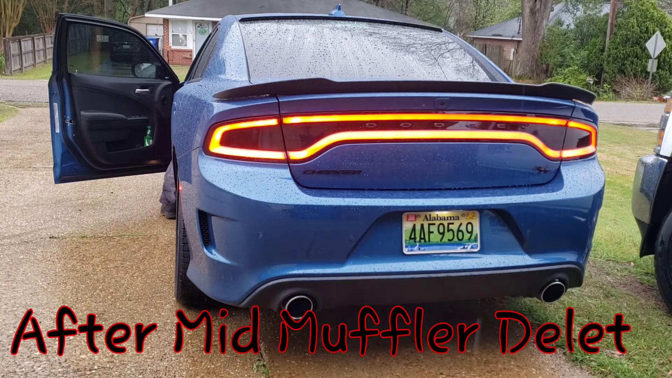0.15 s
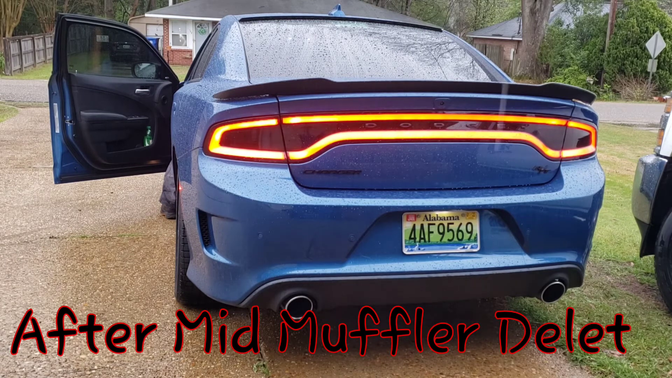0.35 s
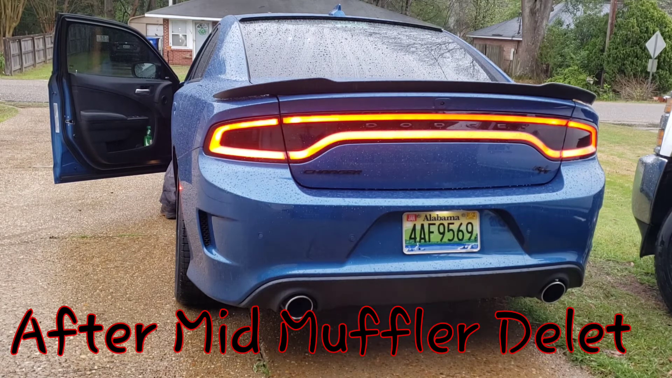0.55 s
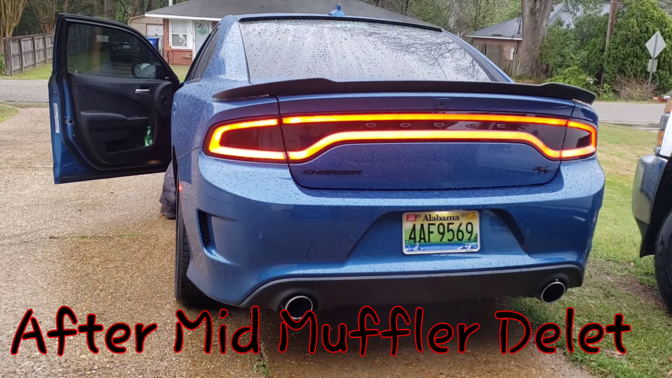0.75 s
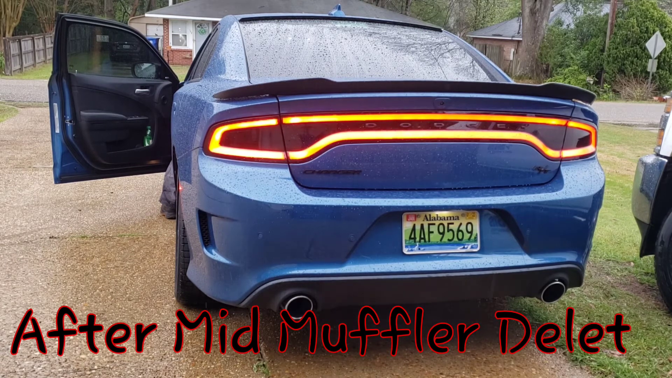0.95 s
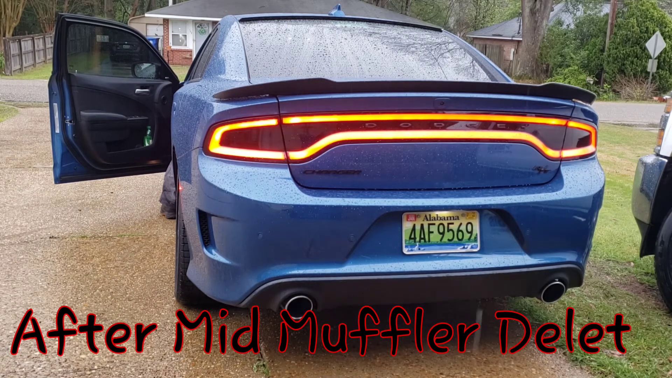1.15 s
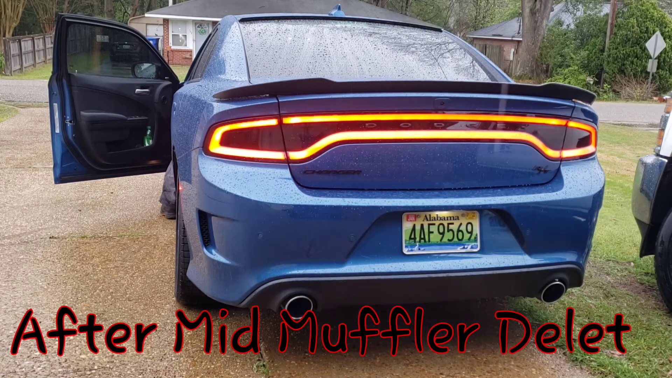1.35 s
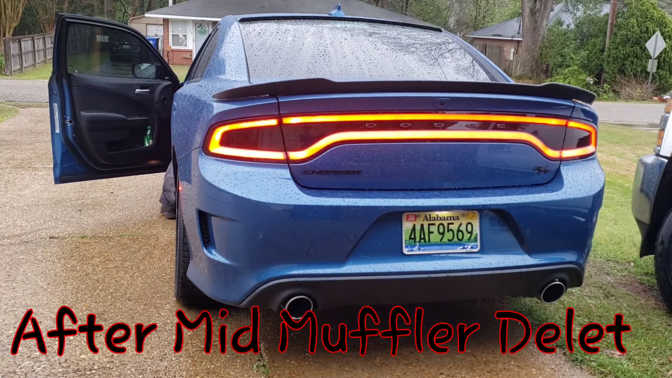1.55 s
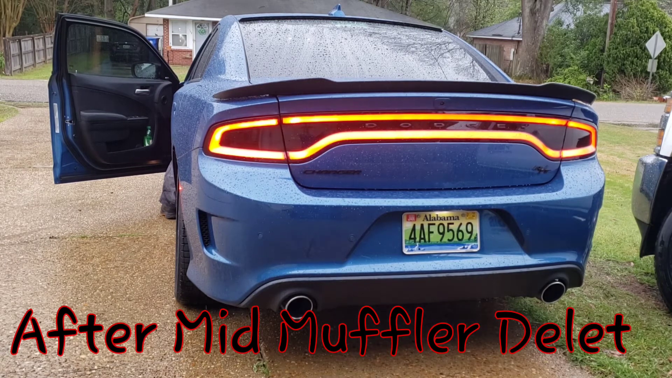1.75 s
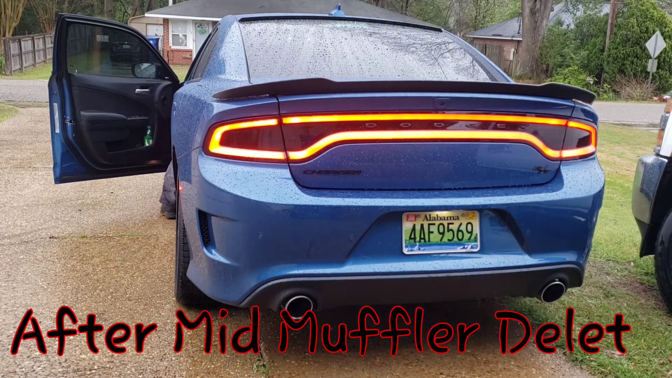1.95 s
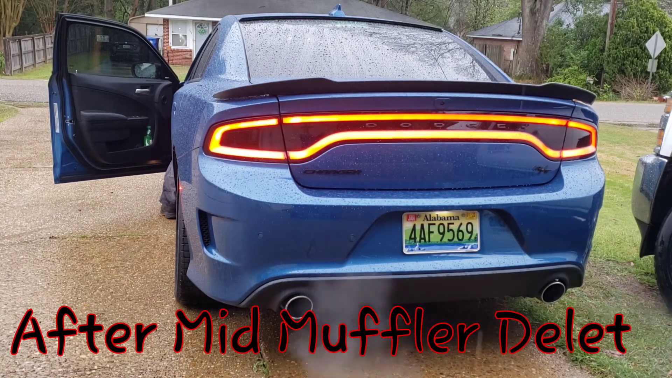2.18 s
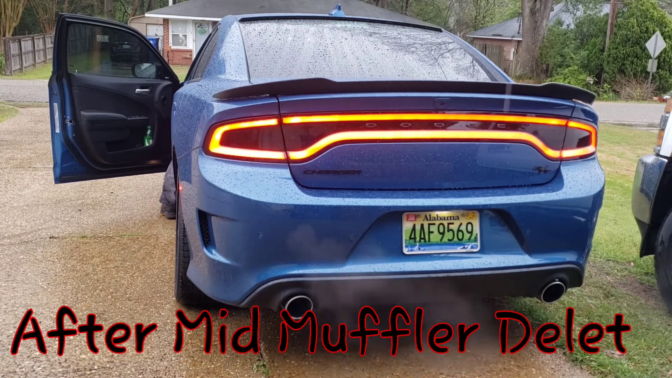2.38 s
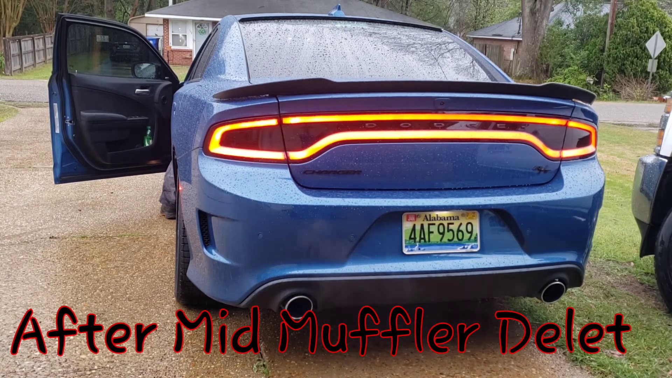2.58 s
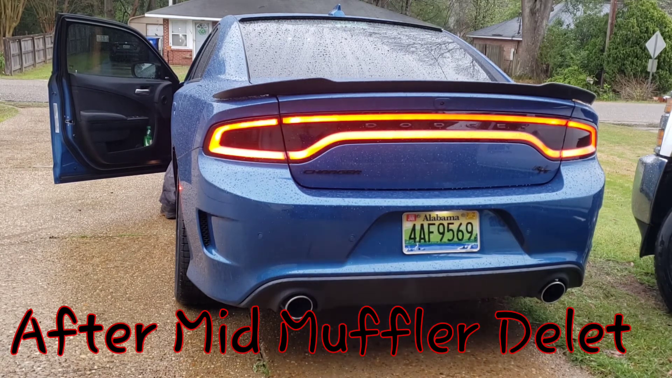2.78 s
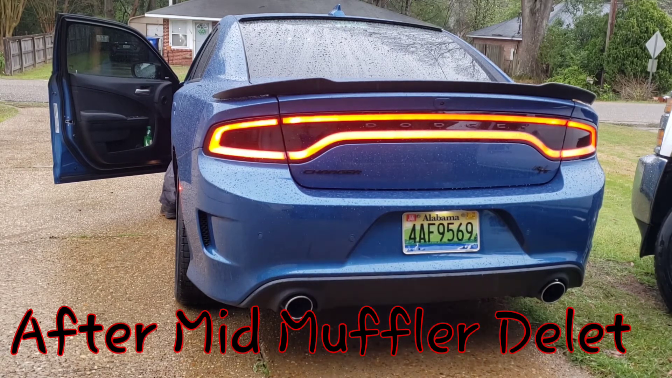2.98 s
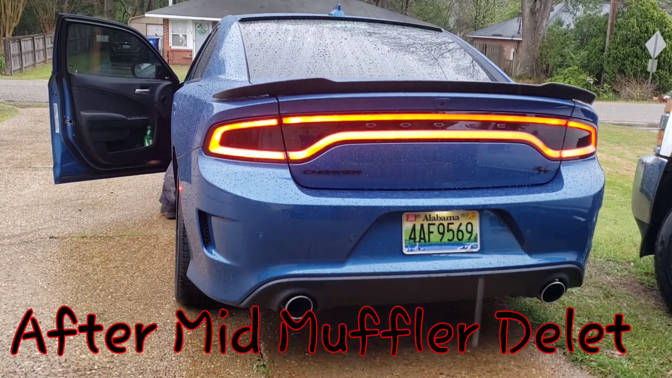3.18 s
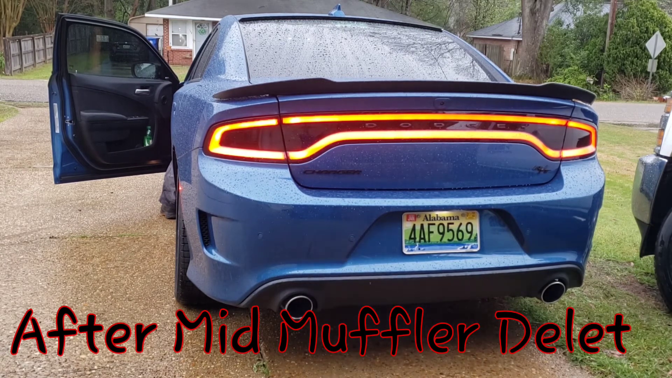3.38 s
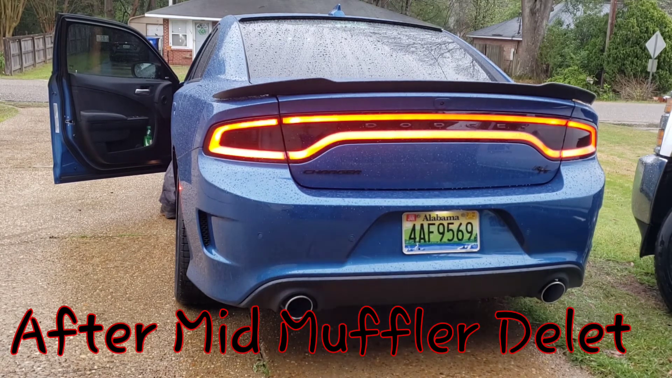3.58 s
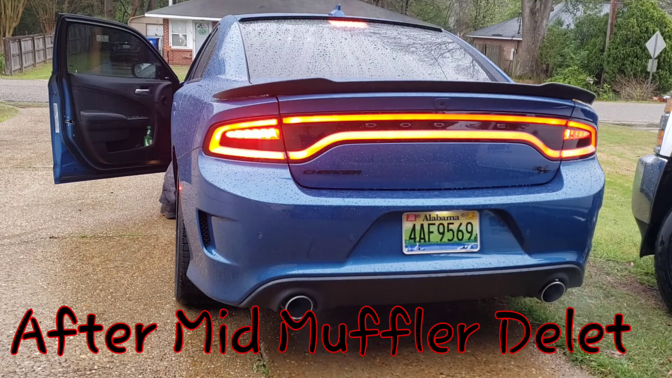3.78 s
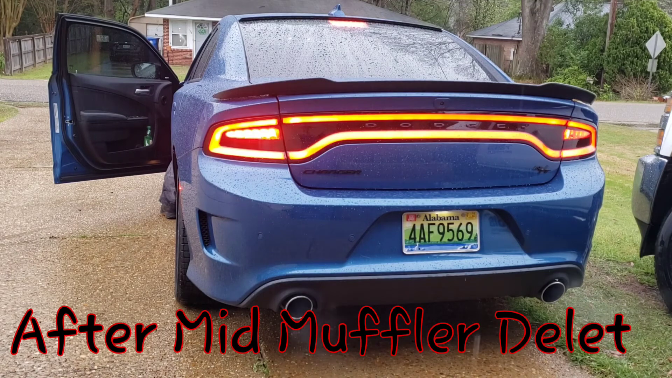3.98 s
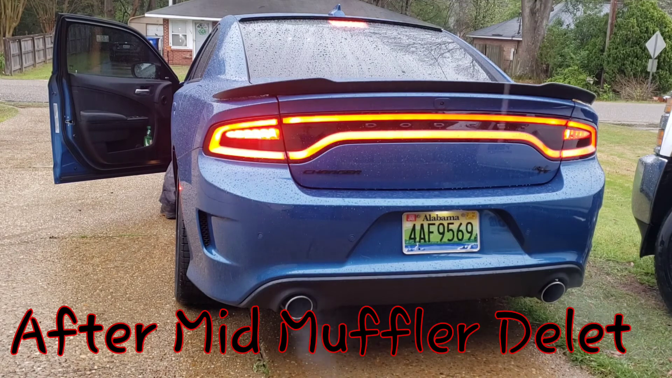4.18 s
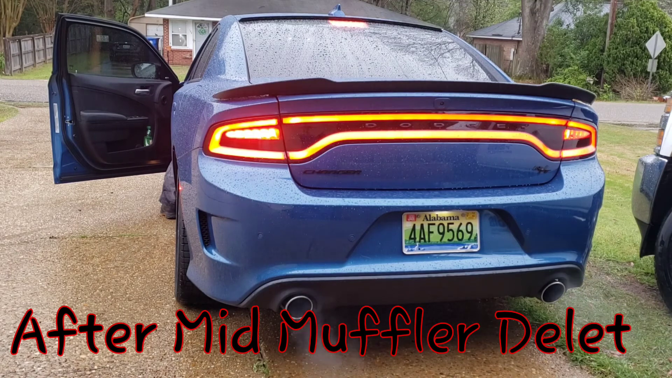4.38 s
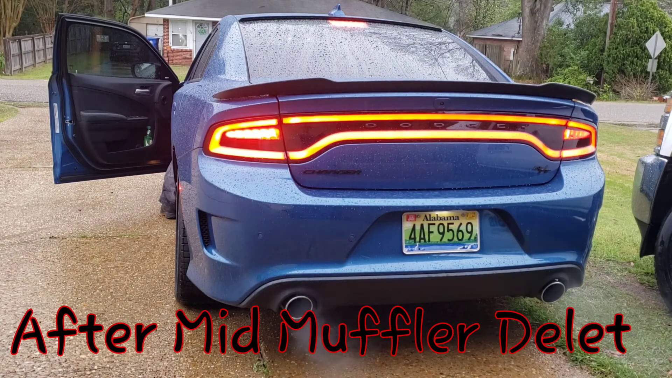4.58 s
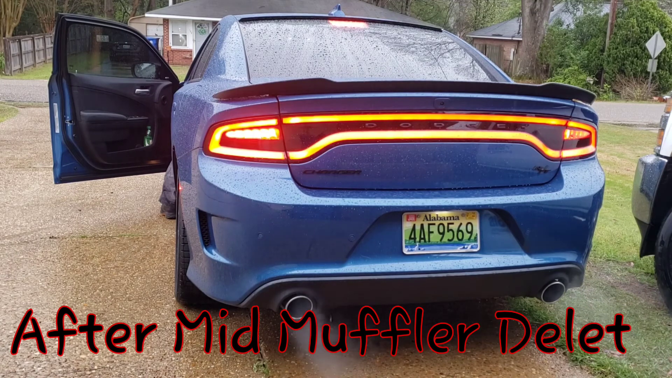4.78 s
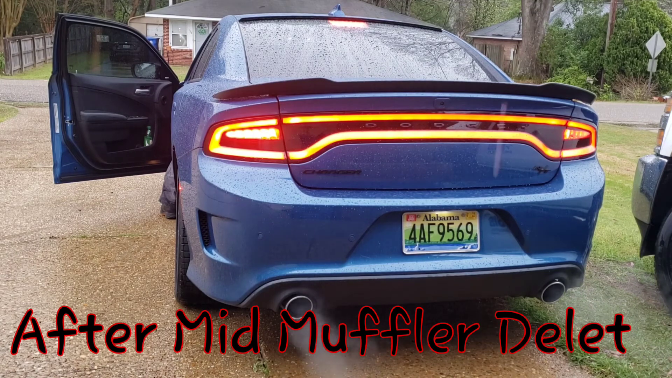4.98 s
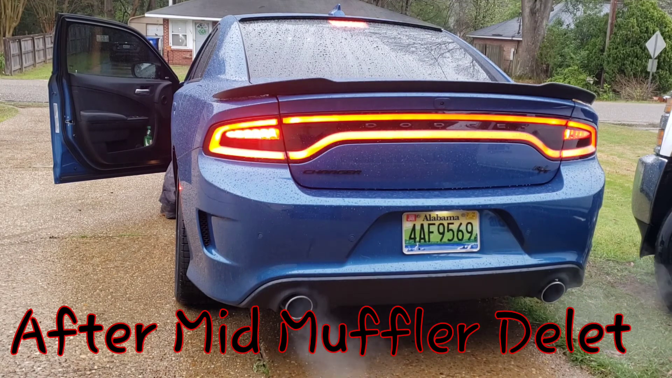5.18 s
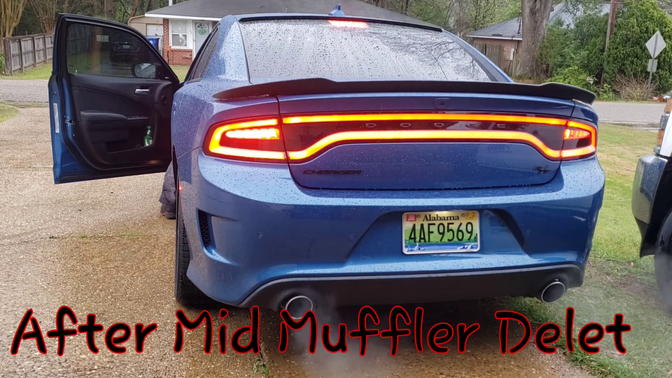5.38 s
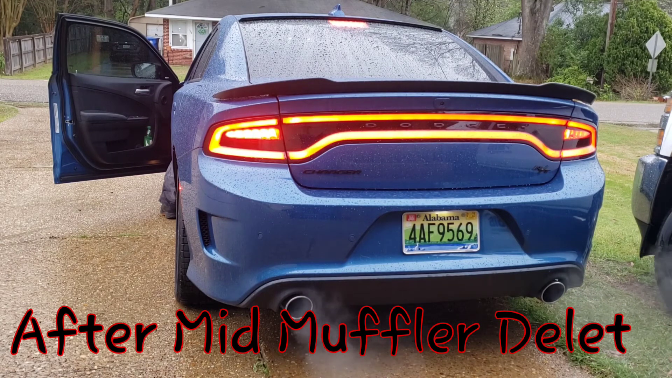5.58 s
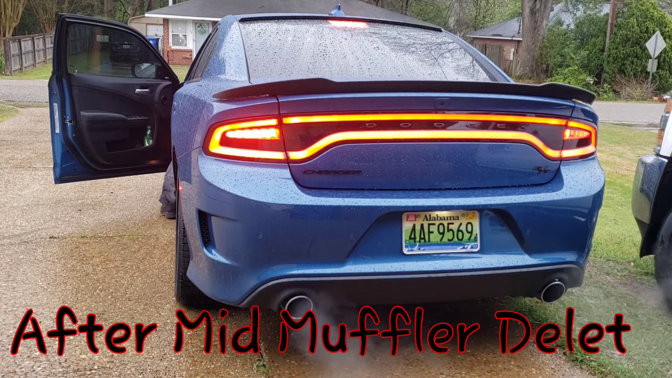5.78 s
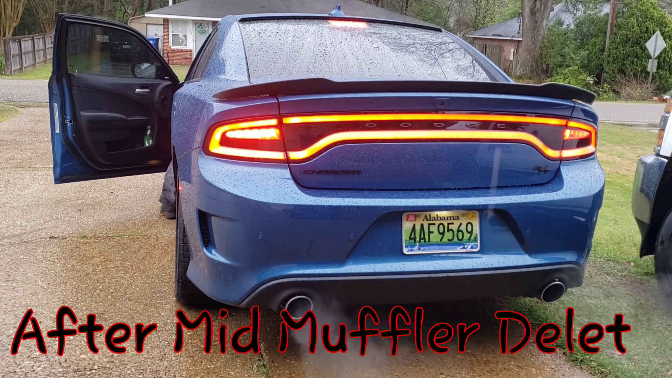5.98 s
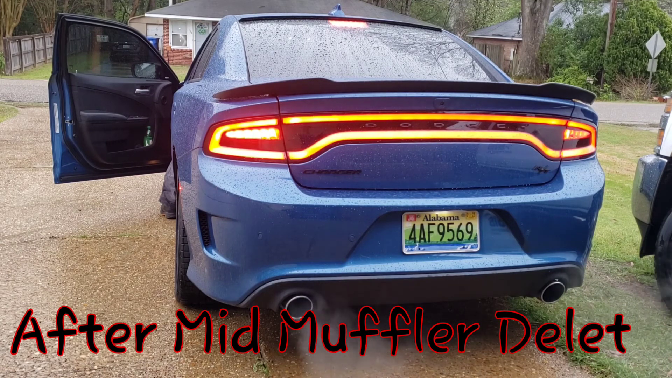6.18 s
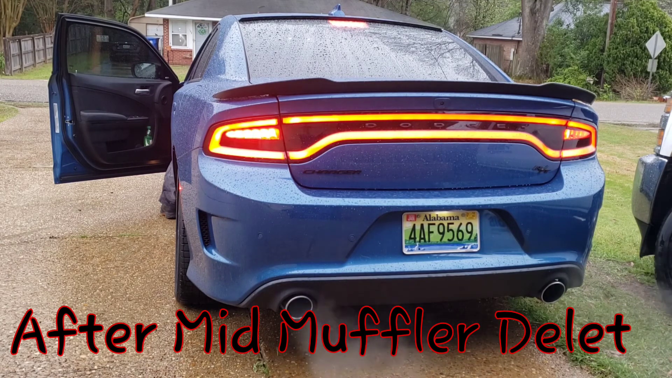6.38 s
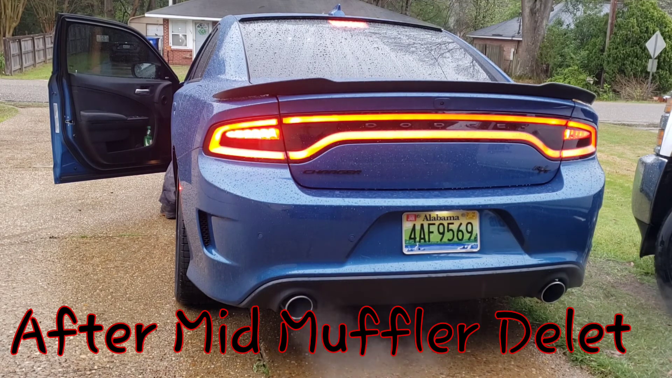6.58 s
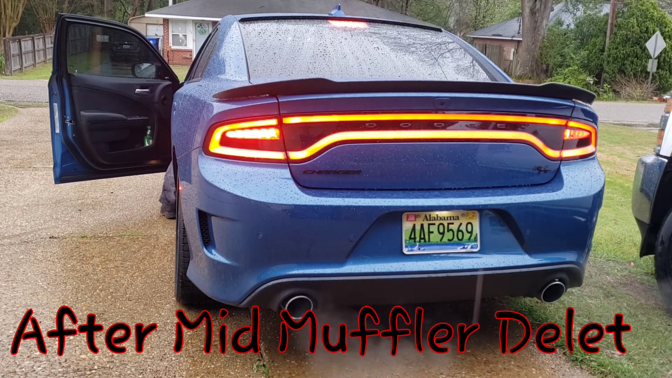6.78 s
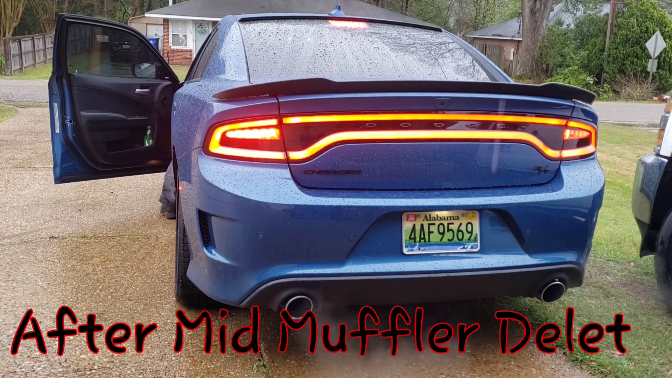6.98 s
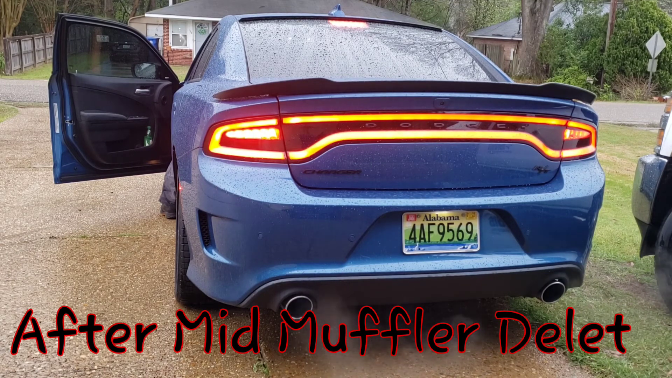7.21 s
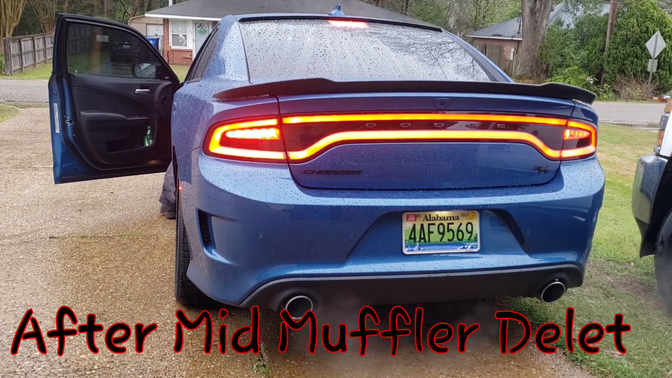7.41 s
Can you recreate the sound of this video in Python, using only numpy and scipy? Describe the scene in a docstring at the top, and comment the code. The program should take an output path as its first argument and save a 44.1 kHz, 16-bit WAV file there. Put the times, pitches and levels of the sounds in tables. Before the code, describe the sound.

A loud V8 car engine revs in sharp, popping blips, winds down almost to silence, then settles into a low idle.

```python
"""Open-exhaust V8 in a driveway

The engine is blipped several times, coasts down almost silent, then settles to idle.
Firings ring the pipes, the two banks beat unevenly, gas hisses and rasps at the tips.
Unburnt fuel pops and loose metal ticks. A phone stands behind the car, in the yard's echo."""
import sys
import numpy as np
from scipy import signal
from scipy.io import wavfile
from scipy.ndimage import uniform_filter1d

SR = 44100
rng = np.random.default_rng(int(sys.argv[2]) if len(sys.argv) > 2 else 0)


def materialize(psi):
    """Save the field psi as 16-bit PCM at rate SR to the path in sys.argv[1].

    A 1-D psi becomes a single channel; in a 2-D psi each row is a channel.
    """
    bounded = np.clip(np.atleast_2d(psi).T, -1, 1)
    quanta = np.round(bounded * 32767).astype(np.int16)
    wavfile.write(sys.argv[1], SR, quanta)


N = 328545
IDLE_HZ, IDLE_LOAD_DB, CYCLE_START_S = 59, -19, 6.354

# Engine speed. Each row: time in seconds, firing rate in Hz.
FIRING_RATE = [(0, 56.6), (.085, 59), (.1, 68), (.15, 74), (.2, 108), (.26, 128), (.33, 142.6), (.5, 140),
               (.55, 152), (.62, 195), (.71, 213), (.85, 222), (1, 206.7), (1.2, 177), (1.34, 161),
               (1.5, 196), (1.58, 198), (1.75, 162.1), (2.06, 132), (2.14, 150), (2.21, 198), (2.3, 221),
               (2.38, 229), (2.46, 268), (2.55, 281.3), (2.72, 255), (3.1, 213.6), (3.8, 134.9),
               (4.2, 105.1), (4.6, 80.92), (5, 69.3), (5.4, 60.56), (5.7, 58.8), (6.4, 58.83),
               (7.45, 59.67)]
# Engine effort. Each row: time in seconds, load in dB.
LOAD = [(0, -20.5), (.078, -22), (.14, -9.5), (.5, -11), (.62, -11.5), (.84, -13.5), (.94, -17.5),
        (1.02, -16.5), (1.3, -18.5), (1.5, -15), (1.63, -20), (2.07, -22), (2.15, -10), (2.35, -11),
        (2.44, -23), (2.58, -18.5), (2.9, -24.5), (3.5, -28), (3.95, -33.5), (4.6, -38), (4.85, -30),
        (5.3, -19.5), (7.45, -19)]
# Firing order. Each row: relative push, lag in ms, gas puff in dB, rattle over the hiss in dB.
CYLINDERS = [(0.9, 0.46, -3.5, -0.5), (0.83, 2.1, -2.5, -5.5), (1.15, 2.48, -4.5, -11),
             (1.05, 1.62, -10, -3.5), (1.2, 2.05, -11, -9), (0.92, 0.94, 0.5, -2.5), (0.35, 0.57, -0.5, -8),
             (0.96, 2.55, -28, -3)]
# Rows of CYLINDERS that feed the first bank.
FIRST_BANK = [1, 3, 4, 6]
# Pipe resonances. Each row: centre and width in Hz, first and second bank in dB, left minus right in dB.
PIPE_MODES = [(57, 56, -40, -4, -3.5), (146, 67, -40, -4.3, 1), (208, 13, 3.3, 0.9, 0),
              (242, 58, 0.2, -16, -1.8), (282, 17, -8.6, -18, -1.5), (349, 68, -17.5, -18, -1.5),
              (440, 60, -22, -24, -4)]
# Gain with speed, one entry per pipe resonance.
PIPE_DB_PER_OCTAVE = [-8, -6, -8, -1, 0.5, 6, 6]
# Pipe boom. Each row: firing rate in Hz, level over the load in dB.
BOOM_RESPONSE = [(59, 9), (69, -1.5), (80, -33), (105, -10), (133, -8.5), (148, 2.5), (165, -4.5),
                 (190, -24.5), (215, -4), (250, 7.5), (280, -30)]
# Singing resonances. Each row: centre and width in Hz, level at idle load in dB, dB per dB of load.
SINGING_MODES = [(144, 28, -14, 1.05), (243, 62, -20, 2), (302, 40, -26, 1.5), (293, 24, -29, 1.6),
                 (314, 18, -23, 1.05), (158, 15, -26, .35), (400, 32, -36, 2.0)]
# The partial driving each singing resonance, as a multiple of the firing rate.
SINGING_ORDERS = [2, 9 / 8, 11 / 8, 12 / 8, 9 / 8, 5 / 8, 2]
# Spectra of gas, loose metal and thuds. Each row: centre in Hz, width in Hz, level in dB.
HOLLOW_MODES = [(152, 20, 0), (235, 26, 0), (290, 20, -3)]
TIP_MODES = [(399, 104, 5), (584.5, 159, 4.5), (787, 54, -7.5), (847.4, 208, 3.5), (1243, 282, 0),
             (1982, 700, -3), (3000, 480, -7.5), (4900, 500, -21)]
ROAR_MODES = [(452, 92, 6.5), (640, 290, 0), (940, 260, -4.5), (1290, 250, -31)]
RASP_MODES = [(71, 120, 25), (460, 180, 8), (3150, 900, 24.5), (4660, 2300, 22), (6250, 4650, 27.5),
              (10870, 6700, 24), (13400, 1000, -8)]
METAL_MODES = [(2090, 220, -1), (2335, 200, 0), (2560, 260, -6), (3000, 260, -16), (3400, 320, -12),
               (5100, 700, -22)]
THUD_MODES = [(69.5, 64, 1.5), (152.5, 22, -8)]
# Throttle blips. Each row: opening, wide open and start of hiss decay in seconds, thump and hiss in dB,
# rasp crest in seconds, rasp in dB, rasp rise and fall in dB/s.
BLIPS = [(0.084, 0.111, 0.19, -3.5, -15.5, 0.15, -22, 61, 145),
         (0.518, 0.524, 0.63, -8, -15.5, 0.568, -11, 1500, 260),
         (0.968, 1.005, 1.24, -22, -37, 1.05, -50, 150, 150),
         (1.4, 1.422, 1.326, -16.5, -17, 1.53, -62, 150, 150),
         (1.607, 1.67, 2.3, -25, -36.5, 2.1, -43, 144, 151.5),
         (2.088, 2.165, 2.23, -12, -12, 2.21, -24.5, 97, 208),
         (2.358, 2.392, 2.35, -34, -11.5, 2.395, -19.5, 296, 299),
         (2.407, 2.409, 2.48, -17, -19.5, 2.468, -9.5, 30, 370),
         (2.703, 2.719, 2.52, -38, -23.5, 2.3, -61, 150, 152)]
# Afterfire. Each row: start in seconds, gas in dB, snap in dB, snap pitch in Hz, thud in dB.
POPS = [(0.086, -15, -22, 3200, -2), (0.098, -10, -17, 1350, -30), (0.148, -4, -10, 1000, -20),
        (0.198, -7, -13, 1050, -25), (0.228, -12, -12, 2900, -23), (0.518, -6, -11, 1200, -6),
        (0.552, -9, -4, 2900, -9), (0.558, -9, -3, 2200, -20), (0.566, -8, -4, 4600, -18),
        (0.573, -9, -8, 3500, -25), (0.598, -8, -10, 2000, -25), (0.630, -9, -13, 1800, -25),
        (1.0, -30, -40, 900, -15), (1.102, -15, -25, 900, -22), (2.357, -12, -18, 3100, -30),
        (2.365, -8, -11, 2200, -30), (2.379, -10, -13, 2100, -30), (2.391, -6, 3, 3600, -15),
        (2.398, -6, -7, 3600, -20), (2.424, -7, -3, 3600, -14), (2.442, -7, -5, 4800, -3),
        (2.476, -12, -11, 2800, -30), (3.14, -27, -40, 900, -34), (3.455, -30, -43, 900, -40)]
# Metal ticks. Each row: start in seconds, blow in dB, crack relative to the blow in dB.
TICKS = [(0.0867, -18, -10), (0.1143, -12, -8), (0.128, -22, -7), (0.1421, -14, 3), (0.179, -12.5, -12),
         (0.2265, -19, -4), (0.2503, -16, -18), (0.2738, -24, -10), (0.4314, -30, -2), (0.5182, -17, -1),
         (0.533, -18, -9), (0.539, -16, -7), (0.5516, -11, -9), (0.558, -18, -16), (1.2176, -34, 3),
         (1.292, -38, 5), (1.63, -32, 0), (1.7749, -28, -12), (1.8267, -32.5, 7.5), (1.883, -32.5, 5),
         (1.9944, -27, 1.5), (2.1241, -24, -8), (2.1432, -22, -4), (2.1625, -16, -8), (2.2465, -31, -8.5),
         (2.2704, -29, -1), (2.3777, -16, -10), (3.5745, -46, 6), (3.6079, -44, 5), (3.6284, -40, -2),
         (3.6827, -41, 0), (3.7167, -41, -4), (3.7401, -30, -7), (3.801, -38, 0), (3.8611, -35.5, -6),
         (3.991, -42, -1), (4.0592, -32, -12), (5.1552, -30, -18), (5.2788, -24, -28), (5.4065, -25, -26),
         (5.5397, -24, -28), (5.7258, -33, -24), (6.2192, -28, -24), (6.2696, -29, -26), (6.354, -21, -30),
         (6.4892, -22, -30), (6.6248, -25, -28), (6.7599, -29, -26), (7.0294, -26, -24), (7.1646, -23, -26),
         (7.2972, -28, -22), (7.4344, -27, -22)]
# Overrun burble. Each row: start and end in seconds, first and last level in dB.
BURBLES = [(0.623, 0.87, -13, -24), (2.503, 2.627, -18, -24), (2.671, 2.82, -25, -28)]


def undb(db):
    return 10 ** (np.asarray(db) / 20)


def unit_rms(x):
    return x / np.sqrt(np.mean(x ** 2))


def pan(left_minus_right_db):
    return undb(np.array([[.5], [-.5]]) * left_minus_right_db)


def butter(x, order, hz, kind="low"):
    return signal.sosfilt(signal.butter(order, hz, kind, fs=SR, output="sos"), x)


def ring(x, hz, width_hz, widen=2):
    """Two resonators in series, unity gain at centre; the second is `widen` times as wide."""
    for band_hz in (width_hz, widen * width_hz):
        x = signal.lfilter(*signal.iirpeak(hz, hz / band_hz, SR), x)
    return x


def strike(blows, modes, widen=2):
    """Modes rung by impulses, gain compensated for width."""
    return sum(undb(db) * SR / (np.pi * width_hz) * ring(blows, hz, width_hz, widen)
               for hz, width_hz, db in modes)


def fade(x, decay_s):
    """Exponential tail on each impulse."""
    return signal.lfilter([1], [1, -np.exp(-1 / (decay_s * SR))], x)


def curve(table):
    """Time table to one value per sample."""
    return np.interp(np.arange(N) / SR, *np.transpose(table))


def spikes(times_s, size):
    """Impulses, each split between two samples."""
    at = np.clip(times_s * SR, 0, N - 2)
    i = at.astype(int)
    return np.bincount(i, size * (1 + i - at), N) + np.bincount(i + 1, size * (at - i), N)


def gas_noise(modes, shared):
    """Stereo noise through resonances; `shared` is the power fraction common to both sides."""
    noise = np.sqrt(shared) * rng.standard_normal(N) + np.sqrt(1 - shared) * rng.standard_normal((2, N))
    return unit_rms(sum(undb(db) * ring(noise, hz, width_hz, 1.39) / np.sqrt(width_hz)
                        for hz, width_hz, db in modes))


def flicker(depth_db=1.6, step_s=.04):
    """Randomly wandering gain."""
    step = int(step_s * SR)
    steps = np.repeat(rng.standard_normal(N // 500), step)[:N]
    return undb(depth_db * unit_rms(uniform_filter1d(steps, step)))


def pipe(pushes, bank, octaves):
    """One bank's soft pushes ring its pipe; speed favours the upper resonances."""
    soft = butter(pushes, 4, 480)
    return sum(undb(bank_db[bank] + tilt_db * octaves) * pan(pan_db) * ring(soft, hz, width_hz, 1.52)
               for (hz, width_hz, *bank_db, pan_db), tilt_db in zip(PIPE_MODES, PIPE_DB_PER_OCTAVE))


def bank_beat(arrival_s, push, in_first, load_db, octaves):
    """The banks arrive in opposition, leaving their uneven beat. Load sets its level."""
    first = pipe(spikes(arrival_s, push * in_first), 0, octaves)
    second = pipe(spikes(arrival_s, push * ~in_first), 1, octaves)
    beat = second - first
    rms = np.sqrt(uniform_filter1d(np.mean(beat ** 2, axis=0), SR // 4) + 1e-18)
    return undb(load_db - 1.5 * octaves) * beat / rms


def boom(firings, firing_hz, load_db, thump):
    """Tone at the firing rate; swells at pipe resonances and with each blip's thump."""
    rate_hz, gain_db = np.transpose(BOOM_RESPONSE)
    level = undb(load_db + np.interp(np.log(firing_hz), np.log(rate_hz), gain_db))
    return np.sqrt(2) * np.hypot(level, thump) * pan(-2.1) * np.cos(2 * np.pi * (firings - .87))


def singing(firings, effort_db, scatter):
    """Single partials sing out as they cross a pipe resonance; scatter makes them waver."""
    song = 0
    for order, (hz, width_hz, db, per_load) in zip(SINGING_ORDERS, SINGING_MODES):
        partial = undb(db + per_load * effort_db) * np.cos(2 * np.pi * order * firings)
        song += ring(partial, hz, width_hz)
    return song * flicker() ** (2 * scatter)


def rumble(effort_db, octaves):
    """Loose gas rumbles in the longest pipe; a hollow tone joins above idle."""
    deep = undb(-29.5 + .56 * effort_db) * unit_rms(ring(rng.standard_normal(N), 54.6, 21))
    hollow = undb(-30 + .8 * effort_db) * np.clip(octaves, 0, 1) * gas_noise(HOLLOW_MODES, .95)
    return deep + hollow


def tip_gas(pulses, hiss_gain, effort_db, octaves):
    """Gas puffs from the tips at each firing: hiss, plus a throaty roar under load at speed."""
    puffs = .5 + uniform_filter1d(fade(pulses, .004), SR // 400)
    puffs /= np.sqrt(uniform_filter1d(puffs ** 2, SR // 7))
    roar_gain = undb(-50.5 + 1.27 * effort_db + 9.5 * octaves)
    return puffs * (hiss_gain * gas_noise(TIP_MODES, .33) + roar_gain * gas_noise(ROAR_MODES, .53))


def tip_rasp(pulses, blip_gain, effort_db):
    """Bright gas noise, crackling at each firing."""
    crackle = 1.2 + fade(pulses, .0068)
    crackle /= np.sqrt(uniform_filter1d(crackle ** 2, SR // 7))
    running_gain = undb(-48.5 + .79 * effort_db) * flicker()
    return np.hypot(running_gain, blip_gain) * crackle * gas_noise(RASP_MODES, .068)


def rattle(blows):
    """Each blow rings the loose metal, which chatters on briefly."""
    chatter = undb(-21) * fade(blows, .011) * rng.standard_normal((2, N))
    return strike(blows + chatter, METAL_MODES, widen=.45)


def exhaust():
    """Eight cylinders fire in turn, driving the pipes, the gas at the tips and a small rattle."""
    firing_hz, load_db = curve(FIRING_RATE), curve(LOAD)
    octaves, effort_db = np.log2(firing_hz / IDLE_HZ), load_db - IDLE_LOAD_DB  # both 0 at idle
    scatter = np.clip(.06 + .26 * octaves - .015 * effort_db, 0, 2)
    hiss_gain = undb(-34 + .81 * effort_db)
    blip_thump, blip_hiss, blip_rasp = throttle_blips()

    firings = np.cumsum(firing_hz) / SR
    firings -= firings[int(CYCLE_START_S * SR)]
    count = np.arange(np.ceil(firings[0]), firings[-1]).astype(int)
    fire_s = np.interp(count, firings, np.arange(N) / SR)
    cylinder = count % len(CYLINDERS)
    push, lag_ms, puff_db, rattle_db = np.transpose(CYLINDERS)[:, cylinder]
    push_draw, puff_draw, rasp_draw, rattle_draw = rng.standard_normal((len(count), 4)).T
    push *= 1 + scatter[(fire_s * SR).astype(int)] * push_draw
    arrival_s = fire_s - .0035 + lag_ms / 1000
    puffs = spikes(fire_s, undb(puff_db + 2 * puff_draw))
    crackles = spikes(fire_s, undb(5.5 * rasp_draw))
    blows = spikes(fire_s, undb(rattle_db + 3 * rattle_draw)) * hiss_gain * undb(-7.5 * octaves)

    pipes = bank_beat(arrival_s, push, np.isin(cylinder, FIRST_BANK), load_db, octaves)
    pipes += boom(firings, firing_hz, load_db, blip_thump)
    pipes += singing(firings, effort_db, scatter) + rumble(effort_db, octaves)
    tips = tip_gas(puffs, np.hypot(hiss_gain, blip_hiss), effort_db, octaves)
    tips += tip_rasp(crackles, blip_rasp, effort_db) + rattle(blows)
    return pipes + tips * pan(-.9)


def air():
    """Faint steady hiss of the wet yard."""
    return undb(-78) * butter(rng.standard_normal((2, N)), 2, 3500, "high")


def throttle_blips(thump_hold_s=.007, thump_fall_db_s=192.5, hiss_fall_db_s=101):
    """Gains of thump, hiss and rasp: each blip opens, then dies away."""
    t = np.arange(0, N / SR, 1 / 2000)
    thump, hiss, rasp = 0, 0, 0
    for open_s, wide_s, fall_s, thump_db, hiss_db, crest_s, rasp_db, up_db_s, down_db_s in BLIPS:
        rise_db = np.where(t < open_s, -np.inf, -10.5 * np.clip((wide_s - t) / (wide_s - open_s), 0, 1))
        thump += undb(thump_db + rise_db - thump_fall_db_s * np.maximum(t - wide_s - thump_hold_s, 0))
        hiss += undb(hiss_db + rise_db - hiss_fall_db_s * np.maximum(t - fall_s, 0))
        rasp += undb(rasp_db + rise_db - np.maximum(up_db_s * (crest_s - t), down_db_s * (t - crest_s)))
    return [np.interp(np.arange(N) / SR, t, gain) for gain in (thump, hiss, rasp)]


def afterfire(snap_rise_cycles=.65):
    """Unburnt fuel goes off in the pipe: a snap, a thud and a dull burst of gas."""
    start_s, gas_db, snap_db, snap_hz, thud_db = np.transpose(POPS)
    snap, t = np.zeros(N), np.arange(SR // 100) / SR
    for at, gain, hz in zip((start_s * SR).astype(int), undb(snap_db), snap_hz):
        age = hz * t / snap_rise_cycles
        snap[at:at + len(t)] += gain * age * np.exp(1 - age) * np.sin(2 * np.pi * hz * t)
    thud = strike(spikes(start_s, undb(thud_db)), THUD_MODES)
    gas = fade(spikes(start_s, undb(gas_db)), .002) * gas_noise(TIP_MODES[2:], .48)
    return snap + thud + butter(gas, 2, 1900)


def metal_ticks():
    """The hardest blows on the loose metal, each with a bright crack."""
    start_s, blow_db, crack_db = np.transpose(TICKS)
    bright = rng.standard_normal((2, N))
    for hz, width_hz in ((3800, 4200), (4200, 7000)):
        bright = signal.lfilter(*signal.iirpeak(hz, hz / width_hz, SR), bright)
    crack = fade(spikes(start_s, undb(blow_db + crack_db)), .015) * bright
    return rattle(spikes(start_s, undb(blow_db))) + crack


def burble(pops_per_s=190, spread_db=6):
    """Runs of small random pops on the overrun, gas alone."""
    pops = np.zeros(N)
    for start_s, end_s, first_db, last_db in BURBLES:
        count = int((end_s - start_s) * pops_per_s)
        jitter, size = rng.random((count, 2)).T
        progress = (np.arange(count) + jitter) / count
        level_db = first_db + progress * (last_db - first_db) + spread_db * (size - .75)
        pops += spikes(start_s + progress * (end_s - start_s), undb(level_db))
    return butter(fade(pops, .004) * gas_noise(TIP_MODES[1:5], .4), 2, 1900)


def yard(x, t60_s=.14, wet_db=-12):
    """Scattered stereo echoes off ground, bumper and house, weak in the bass."""
    t = np.arange(SR // 3) / SR
    tail = rng.standard_normal((2, len(t))) * np.exp(-np.log(1000) * t / t60_s) * (t > .003)
    tail /= np.sqrt(np.sum(tail ** 2, axis=1, keepdims=True))
    wet = signal.fftconvolve(x, tail, axes=1)[:, :N]
    return x + undb(wet_db) * butter(wet, 4, 400, "high")


def scene():
    """The car heard in the yard."""
    return yard(exhaust() + afterfire() + metal_ticks() + burble()) + air()


def record(dry, bass_hz=42, top_hz=15700):
    """The phone drops the deepest bass, rounds the peaks and cuts the top."""
    rounded = np.tanh(.57 * butter(dry, 2, bass_hz, "high"))
    return signal.sosfilt(signal.ellip(10, .2, 80, top_hz, fs=SR, output="sos"), rounded)


dry = scene()
out = record(dry)
materialize(out)
```